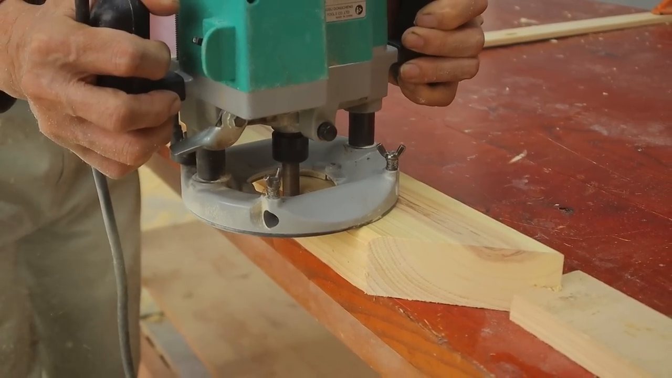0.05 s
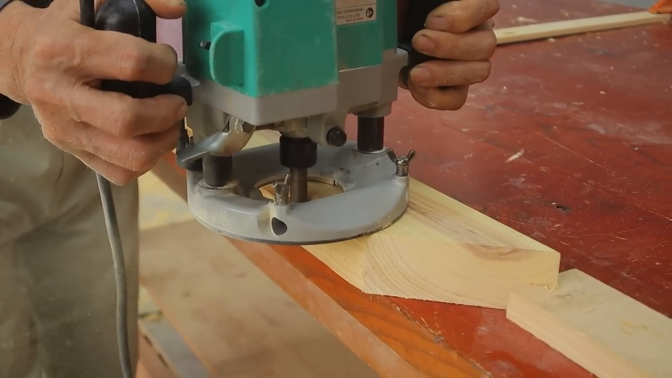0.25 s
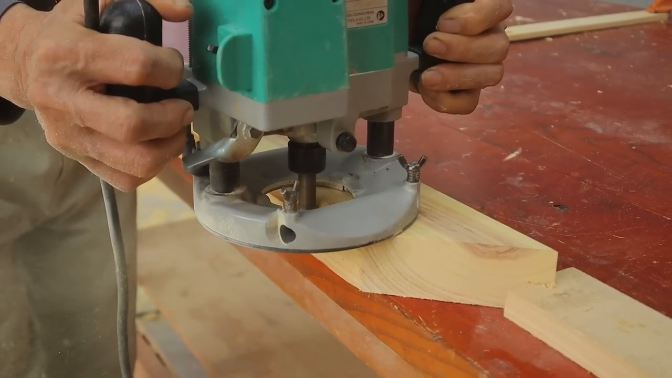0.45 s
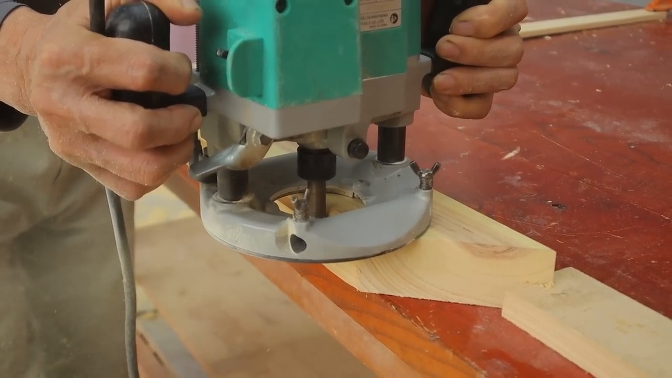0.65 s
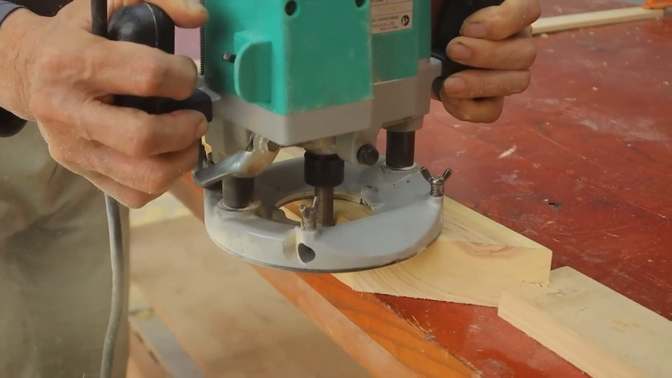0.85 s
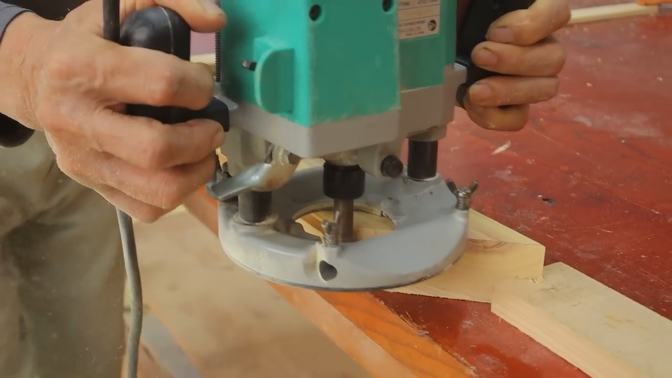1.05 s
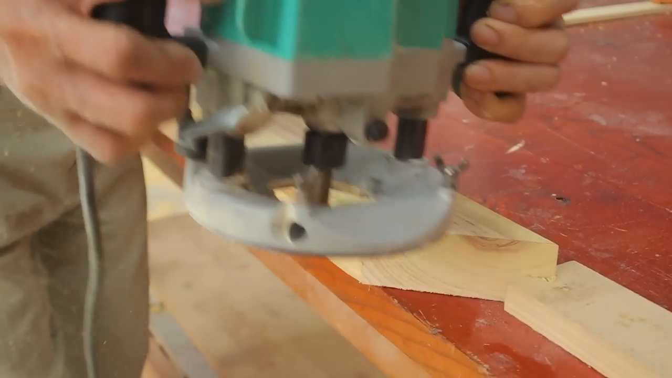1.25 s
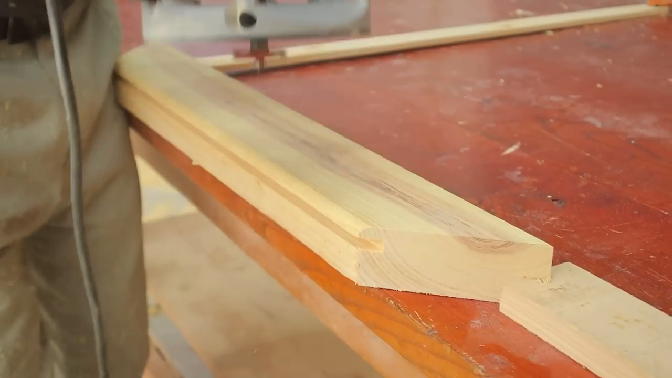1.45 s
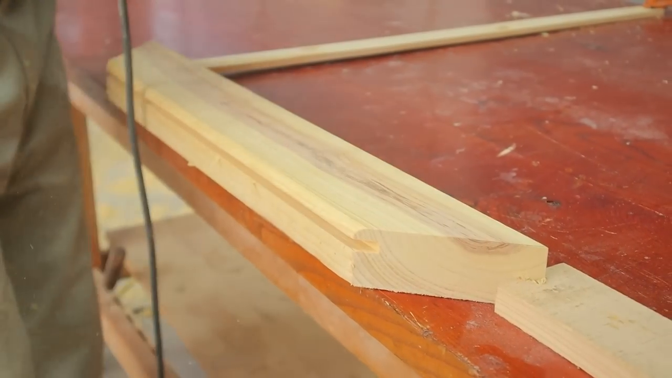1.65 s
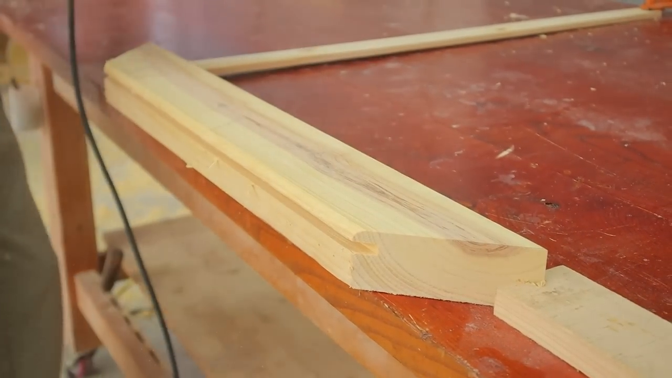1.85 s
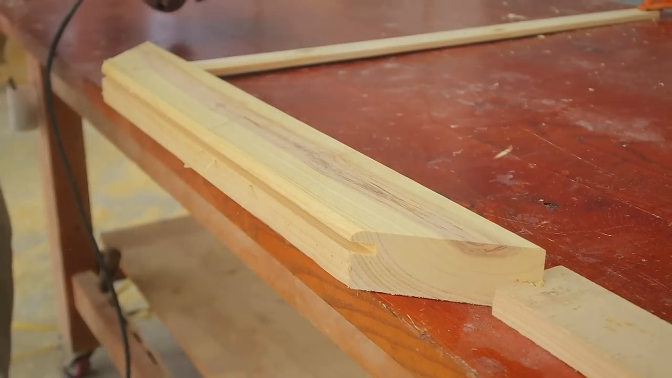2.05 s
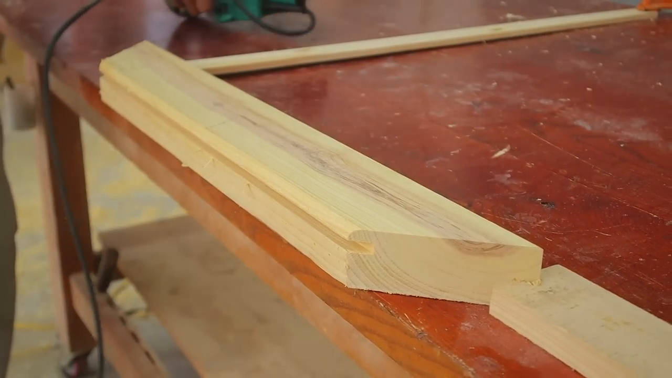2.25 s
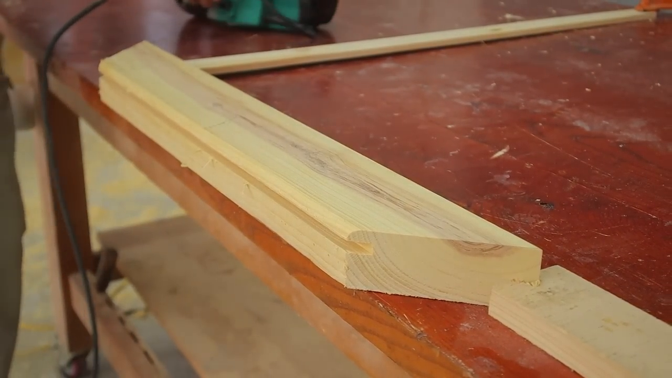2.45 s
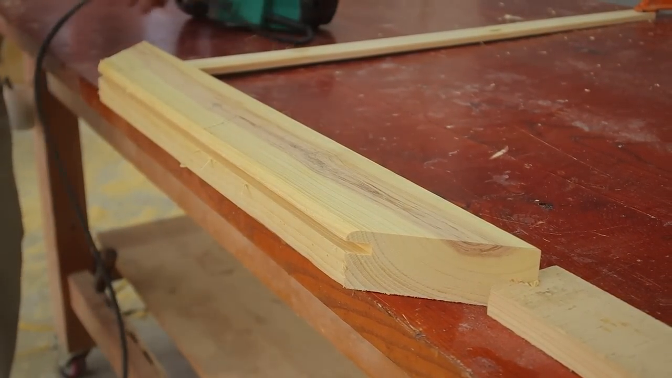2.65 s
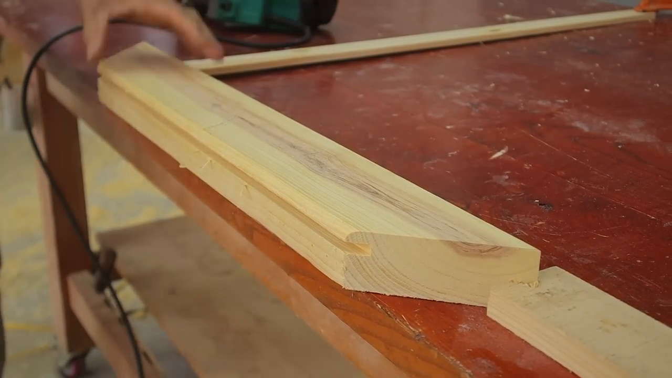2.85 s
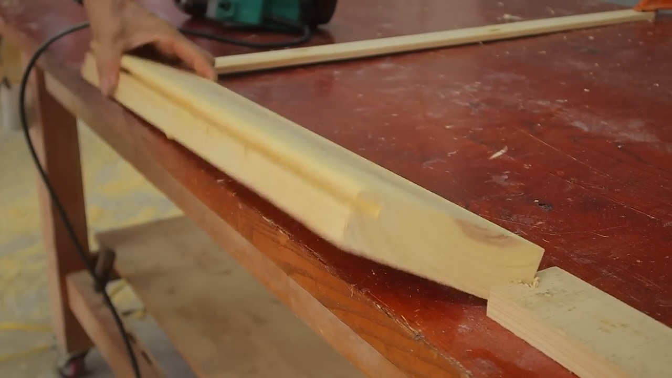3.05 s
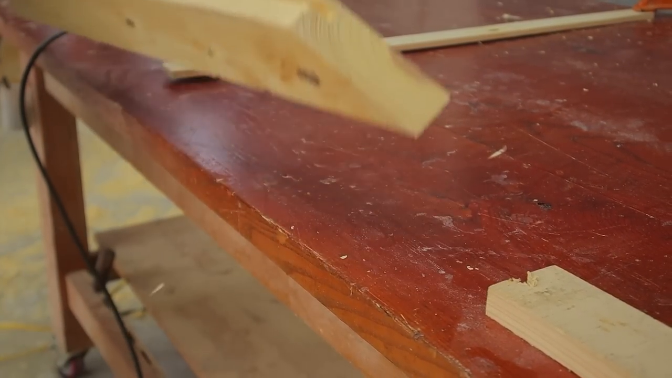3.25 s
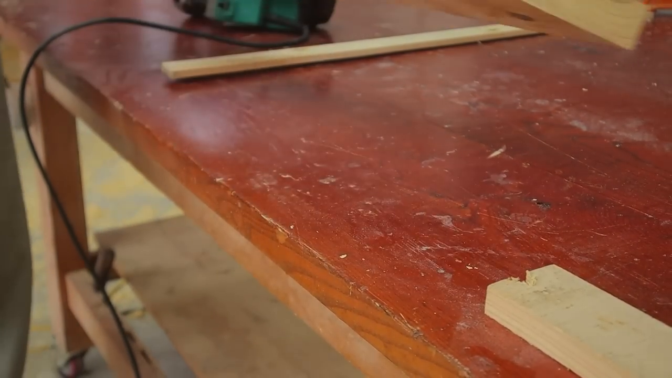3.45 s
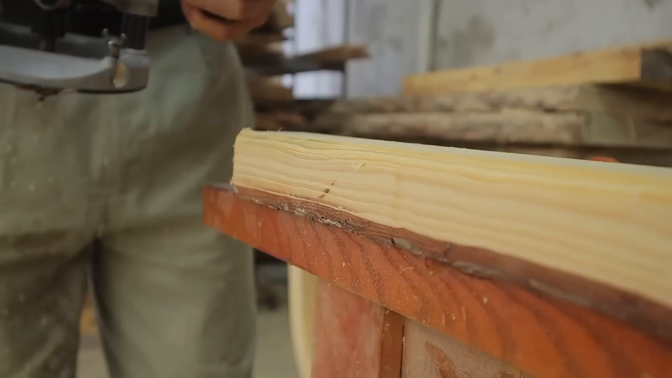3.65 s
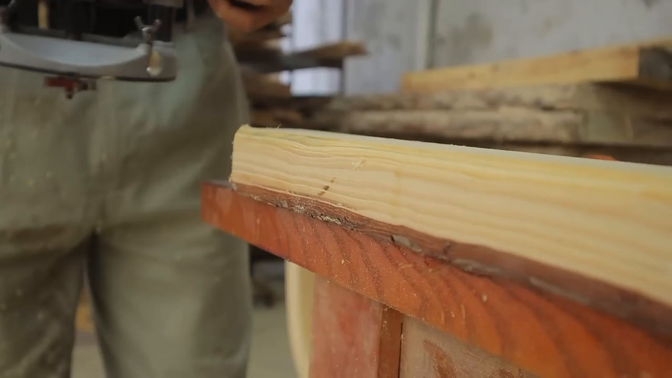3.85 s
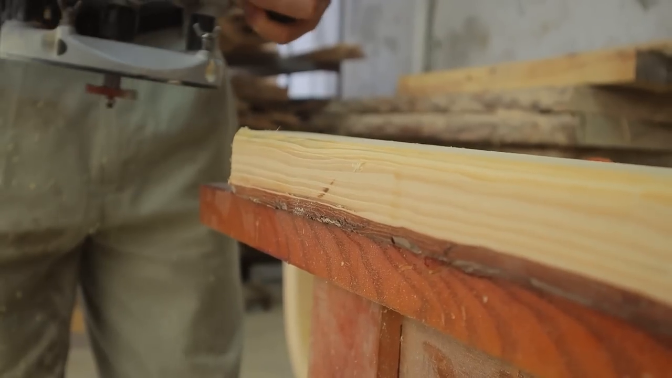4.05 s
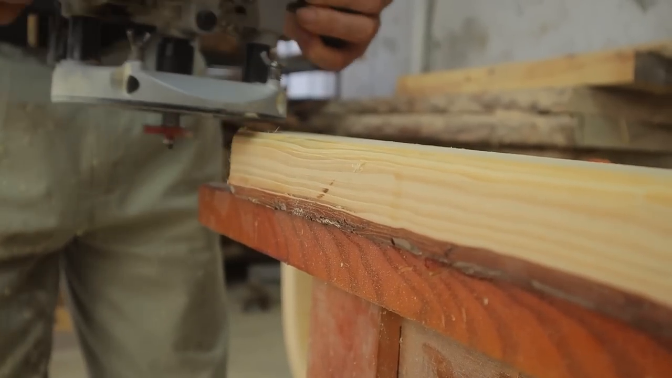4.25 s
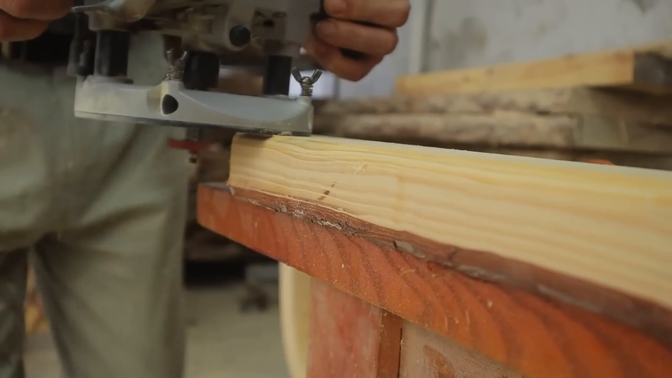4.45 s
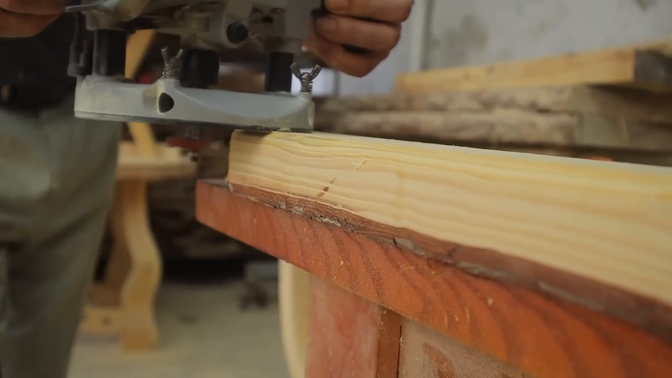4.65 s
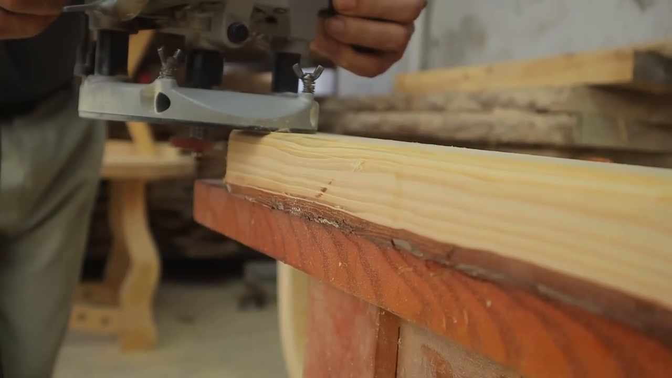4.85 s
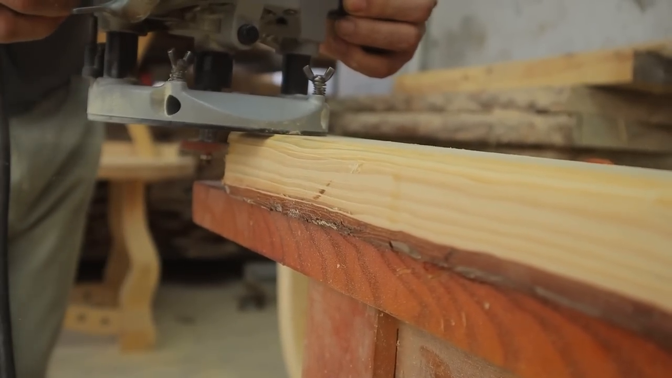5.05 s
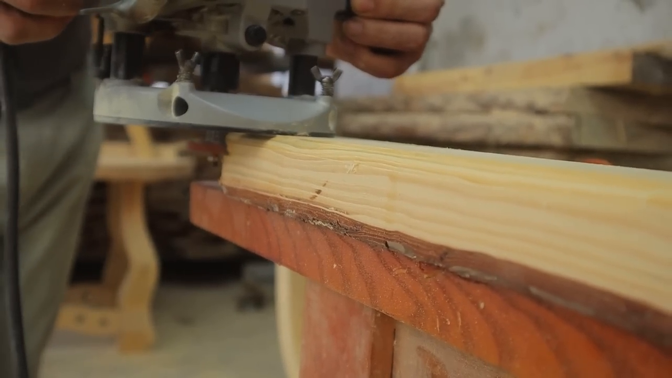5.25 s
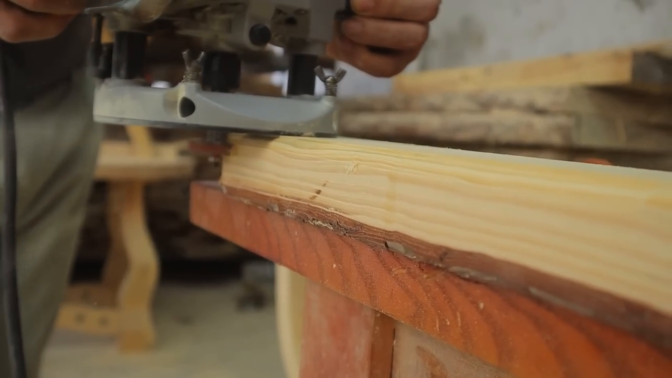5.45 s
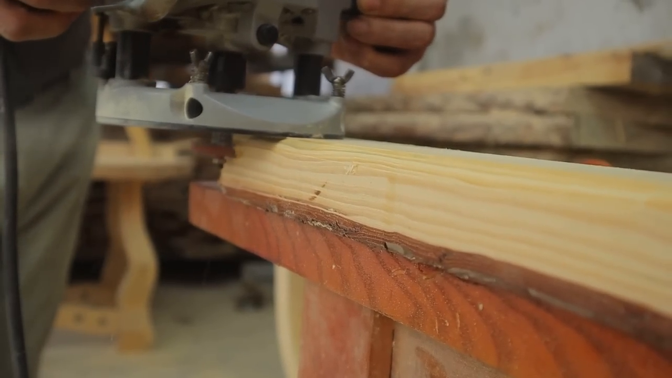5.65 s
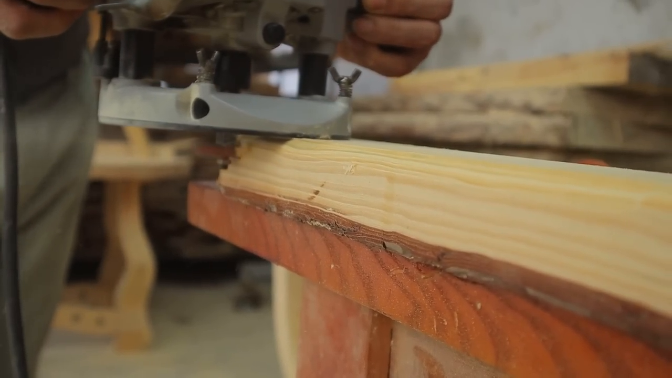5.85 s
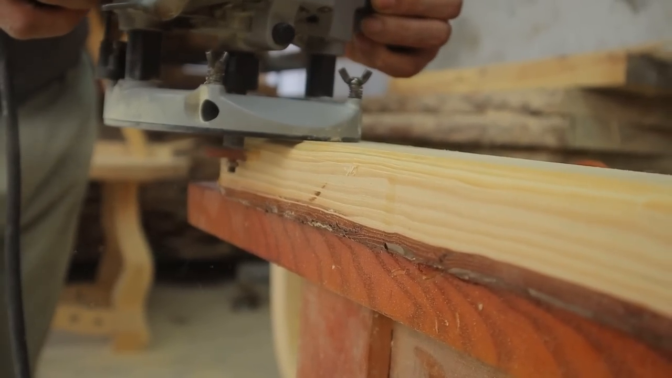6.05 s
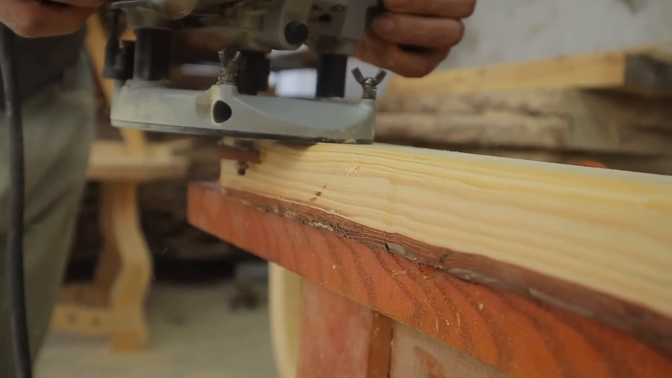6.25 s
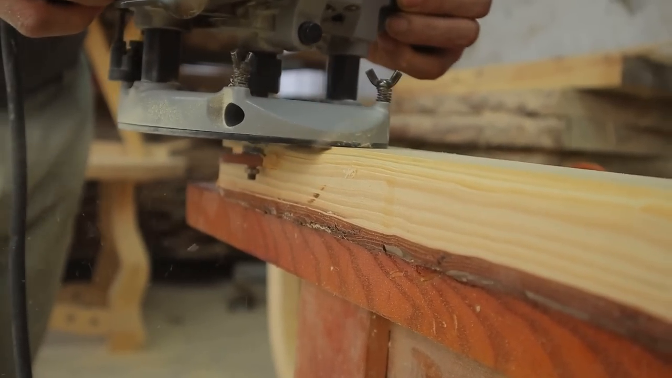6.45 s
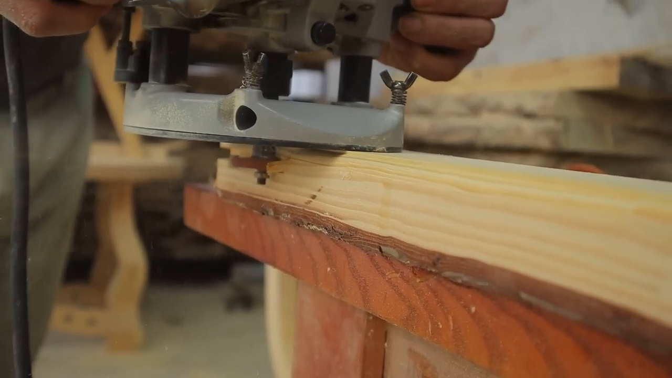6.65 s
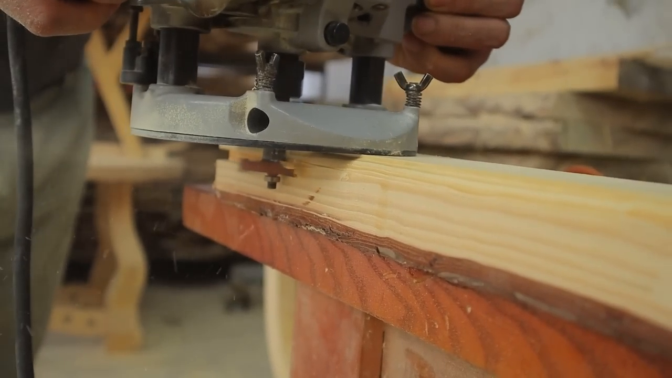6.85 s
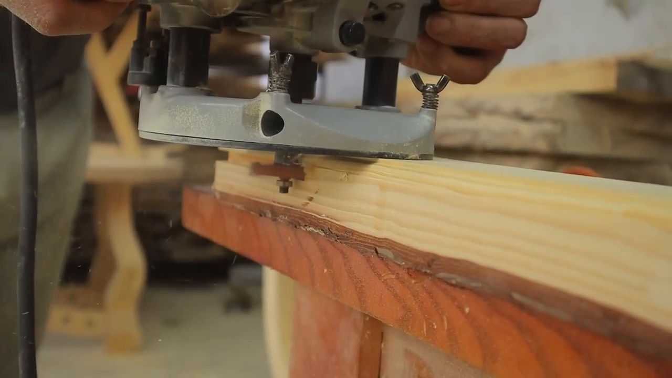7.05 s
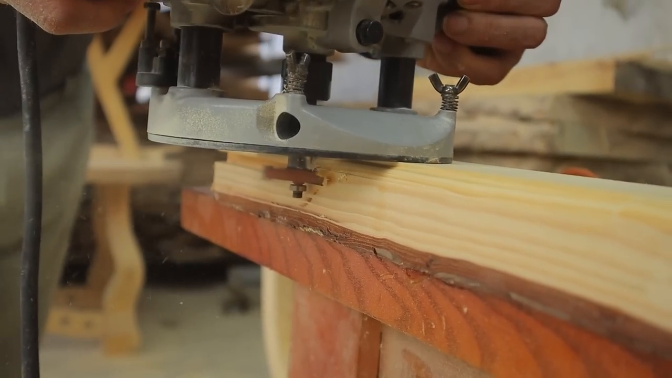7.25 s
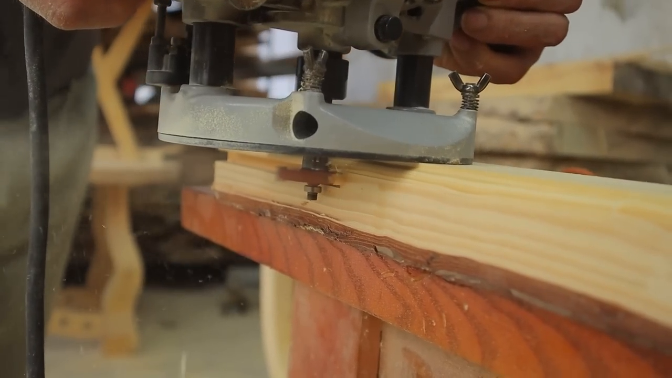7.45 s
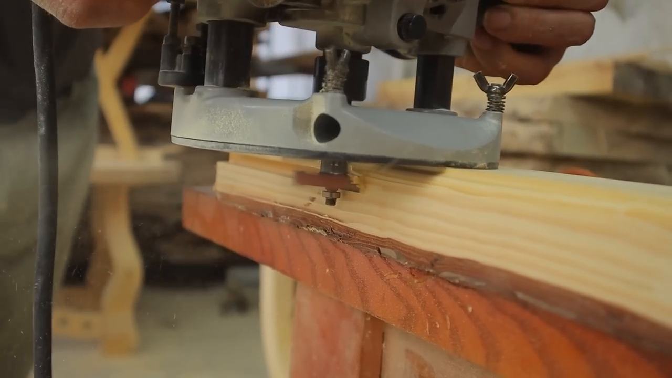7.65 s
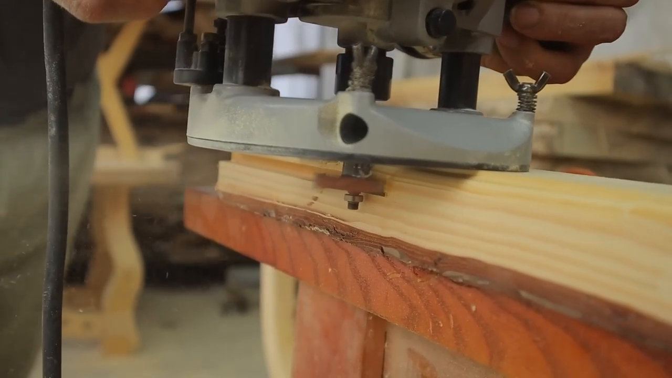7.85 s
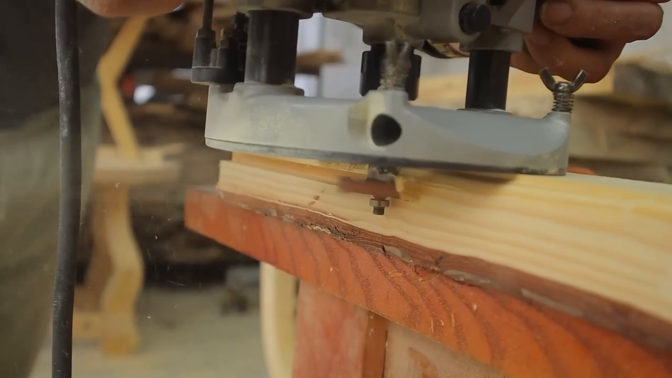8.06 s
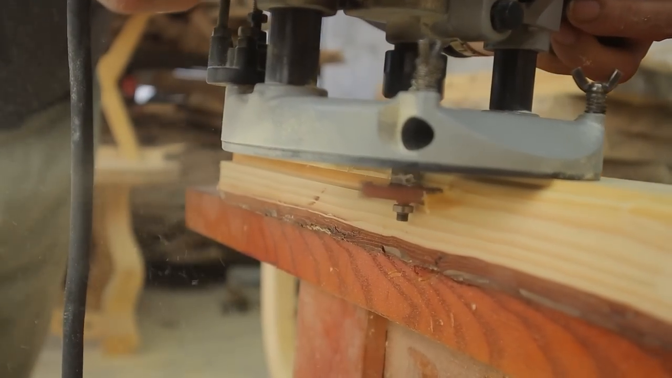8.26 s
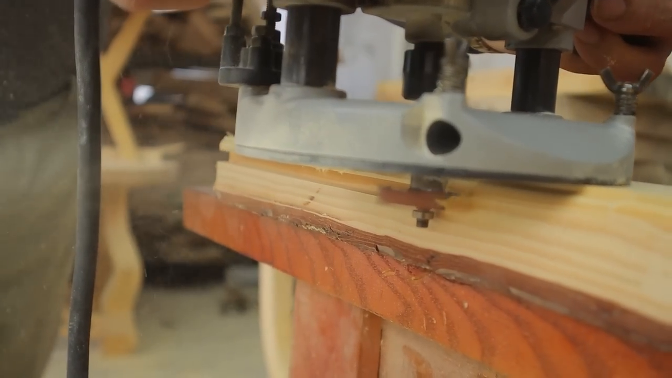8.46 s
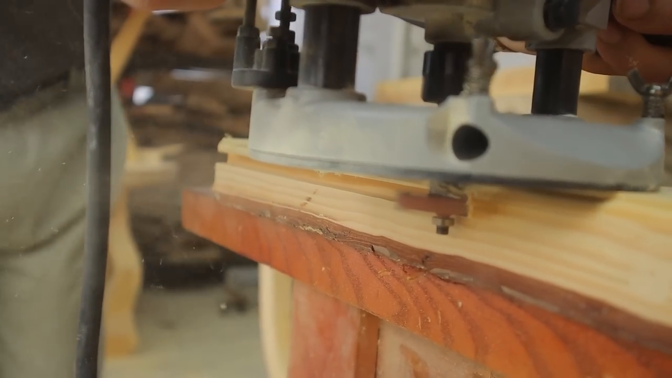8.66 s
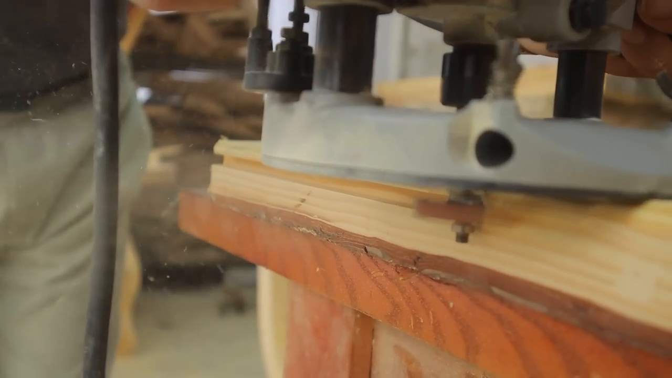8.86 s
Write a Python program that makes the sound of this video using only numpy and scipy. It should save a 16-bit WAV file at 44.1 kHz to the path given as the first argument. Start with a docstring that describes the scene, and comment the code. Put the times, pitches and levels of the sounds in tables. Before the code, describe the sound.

Close, dry stereo sound in a workshop. From 0 to about 1 s a hand router cuts a board edge: a rough, buzzing growl with dense harmonics, snapping wood fibres, thin high whine and throbbing fan rush, its pitch sagging slightly. Around 1.05-1.4 s it lifts clear and the pitch climbs; switched off at 1.4 s, it glides steadily downward, softer and airier, with dull bench knocks at 2.2-2.5 s. A firmer wooden thump at 3.58 s meets an abrupt cut at 3.6 s. Near-quiet follows, with a tiny creak, a click and faint bumps. At 4.05 s a router clicks on with a short rising squeak and races up to a bright, airy whine. From 5 s it bites, pitch falling markedly until about 6.6 s, then wavers in a loud, gritty rasp with low bench hum and soft air buffets from 7.5 s, slightly nearer by the end, still cutting at 9 s.

```python
"""Workshop, two scenes: a hand router mills the edge of a board, lifts off, is switched off and coasts
down while the board is picked up. After a hard cut a router starts up, races freely, then sags as it bites.
One shaft speed drives the cutter harmonics, the whine lines, the throbbing fan noise and the chip bursts.
Knocks, clicks, squeaks and air puffs are placed by table over low hum and shop noise."""
import sys
import numpy as np
from scipy import signal
from scipy.fft import rfft, irfft
from scipy.io import wavfile
from scipy.ndimage import uniform_filter1d

SR = 44100
rng = np.random.default_rng(int(sys.argv[2]) if len(sys.argv) > 2 else 0)


def int16_out(signal):
    """Quantize to a 16-bit WAV file."""
    q = np.round(np.clip(np.atleast_2d(signal).T, -1, 1) * 32767)
    wavfile.write(sys.argv[1], SR, q.astype(np.int16))


N = 392931
T = np.arange(N) / SR
HZ = np.fft.rfftfreq(N, 1 / SR)

# change of scene: (first scene ends [s], end of the near-silent gap [s], router starts up [s])
SCENE_CHANGE_S = (3.608, 3.63, 4.045)
CUT_S, GAP_END_S, START_UP_S = SCENE_CHANGE_S
SWITCH_OFF_S = 1.41
FREE_HZ = 774.3  # cutter strokes per second at free speed, two per shaft turn
# router put aside, then, in the second scene, creeping closer: (time [s], nearness [dB])
NEARNESS_DB = [(0, -0.8), (1, -0.64), (1.2, 0.14), (1.45, 0.26), (1.7, -1.6), (1.95, -3), (3.6, -2.5),
               (4.05, 0), (5.15, .4), (5.7, -0.5), (7.5, 0), (8.1, 0.9)]
# likeness of the two microphone ports, clipped to 0-1: (frequency [Hz], likeness)
PORT_LIKENESS = [(60, 7.5), (500, 3.3), (1300, 0.65), (2100, 1.34), (3400, 1.2), (5500, 0.59), (9000, 0.08),
                 (15000, 0.5)]
# lesser likeness for knocks and puffs: (frequency [Hz], likeness)
LOOSE_LIKENESS = [(60, .97), (130, 0.82), (290, .45), (700, 0.36)]
# colour of low turbulence and rumble: (frequency [Hz], relative density [dB])
RUMBLE_COLOUR = [(25, -29), (60, -4), (120, 0.5), (200, -1), (350, -1), (500, -6.5), (900, -24)]


def amp(db):
    """Amplitude ratio of a level in dB."""
    return 10 ** (np.asarray(db) / 20)


def unit(x):
    """Scale to rms 1."""
    return x / np.sqrt(np.mean(x ** 2) + 1e-20)


def curves(rows):
    """Each value column of a (time [s], values) table, at every sample."""
    s, *columns = np.transpose(rows)
    return [np.interp(T, s, column) for column in columns]


def read(points, hz=HZ):
    """Interpolate a (frequency [Hz], value) table over log frequency."""
    f, value = np.transpose(points)
    return np.interp(np.log(hz + 1), np.log(f + 1), value)


def add(mix, s, sound):
    """Add a sound to the mix in place, starting at s seconds."""
    part = mix[round(s * SR):][:len(sound)]
    part += sound[:len(part)]


def wander(rate_hz):
    """Random curve of rms about 1: straight lines between rate_hz random knots per second."""
    knots = rng.standard_normal(8192)
    return 1.22 * np.interp(T * rate_hz, np.arange(len(knots)), knots)


def ports(a, b, likeness=PORT_LIKENESS):
    """Mix two spectra into a partly alike left and right, with a phase lead between them."""
    # (frequency [Hz], lead of left over right [rad])
    lead_rad = [(60, 0.5), (220, -2.6), (480, -0.14), (4300, 0.53), (6000, 0.45), (9300, 0.2), (10800, -3)]
    same = np.clip(read(likeness), 0, 1)
    shared = np.sqrt((1 + same) / 2) * a
    apart = np.sqrt((1 - same) / 2) * b
    turn = np.exp(.5j * read(lead_rad))
    return irfft(np.array([(shared + apart) * turn, (shared - apart) / turn]), N)


def noise(colour_db, grain=1, likeness=PORT_LIKENESS):
    """Stereo noise of rms 1: white noise times a grain in time, then coloured."""
    a, b = rfft(rng.standard_normal((2, N)) * grain) * amp(colour_db)
    return unit(ports(a, b, likeness))


def bite():
    """Depth of the cutter in the wood, 0-1, at every sample."""
    # (time [s], depth)
    depth = [(1.03, 1), (1.1, .4), (1.18, .22), (1.25, 0), (4.97, 0), (5.03, .45), (5.7, 1)]
    return np.clip(curves(depth)[0], 0, 1)


def race(s, from_hz, spin_up_s=.32):
    """Stroke rate of the unloaded motor from time s, closing in exponentially on its free speed."""
    return FREE_HZ + (from_hz - FREE_HZ) * np.exp(-np.maximum(T - s, 0) / spin_up_s)


def speed(start_up_hz=382.6, coast_s=2.845):
    """Strokes per second: cutting, lifting off, slowing by friction; then starting up and cutting."""
    # (time [s], stroke rate [Hz])
    first_cut_hz = [(0.02, 564.7), (0.136, 544), (0.29, 530.2), (0.698, 514), (0.93, 513), (1.032, 517.2),
                    (1.1, 534)]
    # (time [s], stroke rate [Hz])
    second_cut_hz = [(5.02, 755), (5.14, 730), (5.32, 645.7), (5.47, 637.3), (5.7, 587), (5.8, 572.6),
                     (6.03, 558.5), (6.6, 515.2), (6.74, 514.8), (6.92, 526), (7.09, 529.2), (7.31, 521.3),
                     (7.53, 528), (7.8, 525.1), (8.19, 510.5), (8.4, 525.2), (8.57, 510), (8.76, 528),
                     (8.9, 529.3)]
    lift_s, lift_hz = first_cut_hz[-1]
    second_cut_s = second_cut_hz[0][0]
    lifted = race(lift_s, lift_hz)
    coasting = np.interp(SWITCH_OFF_S, T, lifted) * np.exp((SWITCH_OFF_S - T) / coast_s)
    return np.select([T < lift_s, T < SWITCH_OFF_S, T < START_UP_S, T < second_cut_s],
                     [curves(first_cut_hz)[0], lifted, coasting, race(START_UP_S, start_up_hz)],
                     curves(second_cut_hz)[0])


def shaft(rate_hz, jitter=0.001063, jitter_hz=110):
    """Phase of the cutter strokes: the integrated rate, with a small random speed jitter."""
    return 2 * np.pi * np.cumsum(rate_hz * (1 + jitter * wander(jitter_hz))) / SR


def flow(rise_s=0.05):
    """Share of the air flow built up: exponential rise after the start-up, 1 before it."""
    since_s = T - START_UP_S
    return np.where(since_s > 0, 1 - np.exp(-abs(since_s) / rise_s), 1)


def strengths(rate_hz, tones_db=0, rasp_db=-1.57, build_up=3):
    """Gains of the four low tones and the rasp: set by the cut in the wood, by the speed in free air."""
    # (time [s], low tones [dB], rasp [dB]), before the offsets below
    first_force = [(0.0, -31, -28.5), (0.092, -26, -29.5), (0.428, -25.5, -32.5), (0.658, -23.5, -29),
                   (0.712, -24.5, -33), (1.05, -26.5, -25)]
    # (time [s], low tones [dB], rasp [dB])
    second_force = [(5.03, -27.5, -25), (5.06, -24.5, -32), (5.15, -30, -30), (5.3, -27.5, -31),
                    (5.36, -33.5, -36), (5.67, -24, -29.5), (6.07, -22, -30.5), (6.14, -25, -29.5),
                    (6.23, -21.5, -28.5), (7.43, -27.5, -26.5), (7.51, -22, -25), (8.03, -25.5, -22),
                    (8.8, -23, -25.5), (8.9, -24.5, -22)]
    # response of the board under the cutter: (frequency [Hz], level [dB])
    board_db = [(510, -17.5), (528, -19), (542, -4), (556, 0.5), (572, -10), (640, -8.5), (760, -16),
                (1030, -12), (1120, -11), (1300, -3), (1480, -2), (1570, -4), (1720, -4.5), (2060, -4),
                (2200, -3.5), (2350, 1), (2600, -2), (3000, -10)]
    # response of the router in free air: (frequency [Hz], level [dB])
    body_db = [(345, -47), (520, -57.5), (640, -49.5), (740, -49.5), (840, -46), (920, -63), (1070, -48),
               (1170, -62), (1390, -44.5), (1580, -53), (1760, -35), (1900, -30.5), (2040, -40.5),
               (2180, -55), (2800, -43)]
    # (stroke multiple, first cut [dB], second cut [dB], free air [dB], free-air slope [dB/octave of speed])
    low_tones = [(1, 1, -2, -1.5, 2.5), (2, 0.5, -0.5, 0, 15.5), (3, -3.5, 0, 0, 37), (4, 2, -1.2, -11, 45)]
    full_contact = 0.47  # depth that gives full cutting strength
    lifted_db = 3.5  # louder when clear of the wood after the first cut
    singing_hz = 668  # stroke rate at which the free rasp is loudest
    free_rasp_db, off_speed_db = -35.5, 130  # level there, loss an octave away

    tones, rasp = curves(list(first_force) + list(second_force))
    contact = np.minimum(bite() / full_contact, 1)
    early = T < CUT_S
    # the tones come in later than the rush
    free = (1 - contact ** 2) * flow() ** build_up * amp(lifted_db * early)
    octaves = np.log2(rate_hz / singing_hz)
    low = []
    for k, (_, first, second, free_db, doubling_db) in enumerate(low_tones, 1):
        cutting = amp(tones + tones_db + read(board_db, k * rate_hz) + np.where(early, first, second))
        running = amp(free_db + doubling_db * octaves + read(body_db, k * rate_hz))
        low.append(contact * cutting + free * running)
    singing = amp(free_rasp_db - off_speed_db * octaves ** 2 + curves(NEARNESS_DB)[0])
    return low, contact * amp(rasp + rasp_db) + free * singing


def cutter(phase, low, rasp, dull_db=8.0, flutter_db=1.47, chatter_db=2, drift_db=1.5,
           free_drift_db=2.35, rough=0.034, spread=0.41):
    """Each edge stroke repeats one push on the wood: a stack of harmonics with ripple side tones."""
    # (stroke multiple, first pass [dB], second pass [dB])
    rasp_lines = [(5, -6.5, -5), (5.77, -1.5, -4.5), (6.77, -13, -6), (8, -8.5, -12.5), (8.8, -7.5, -15.5),
                  (9.7, -13.5, -19), (12.106, -15.5, -18.5), (12.9, -35, -36), (15.1, -33, -28),
                  (17.8, -30, -27), (23, -30, -26.5), (27, -35, -36)]
    # side tones from mains ripple in the torque: (offset [Hz], level [dB])
    ripple = [(200.5, -19), (401, -19), (-200.5, -24), (601.5, -27)]
    depth = bite()
    free = 1 - depth
    grazing = 4 * depth * free  # a cutter that only just touches the wood chatters
    shake_db = flutter_db + chatter_db * grazing
    sway_db = drift_db + free_drift_db * free  # tones swell and fade more in free air

    tones = []
    for k, gain in enumerate(low, 1):
        level = gain * amp(shake_db * wander(35) + sway_db * wander(11))
        tones.append(level * np.exp(1j * (k * phase + 2 * np.pi * rng.random())))
    lowest, *others = tones
    stack, side = sum(others), np.zeros(N)

    multiple, first, second = np.transpose(rasp_lines)
    for k in range(5, 28):
        db = np.where(T < CUT_S, np.interp(k, multiple, first), np.interp(k, multiple, second))
        db = db + 1.5 * wander(22) + .8 * wander(4)  # the grain changes along the board
        db -= dull_db * free * min(k - 5, 6)  # out of the wood the strokes lose their edge
        line = rasp * amp(db) * np.exp(1j * (k * phase + 2 * np.pi * rng.random()))
        stack += line
        side += line.imag * wander(4.0)

    stack *= 1 + sum(amp(db) * np.exp(2j * np.pi * (hz * T + rng.random())) for hz, db in ripple)
    sound = (lowest + stack).real * (1 + rough * wander(400))
    return ports(rfft(sound), rfft(side + spread * stack.imag))


def whine(phase, rush, flutter_db=3, blur_rad=0.91, free_db=-11, unload_s=1.34):
    """Thin shaft, fan and commutator lines; the high ones sink into the rush when racing freely."""
    # levels against the rush: (stroke multiple, under load [dB], coasting [dB])
    whine_lines = [(0.498, -30.5, -41), (12, -15.5, -32), (14, -38, -24), (15, -24, -36), (16, -15, -19),
                   (18, -34, -15), (20, -17.5, -25), (22, -38, -32), (24, -21, -32), (27.9, -19, -29),
                   (32.03, -34, -25)]
    # muffling of the highest lines by the housing: (frequency [Hz], level [dB])
    muffling = [(10500, -2), (13000, -5), (15500, -9)]
    coasting = np.clip((T - SWITCH_OFF_S) / unload_s, 0, 1) * (T < START_UP_S)
    racing = (1 - bite()) * (1 - coasting)
    rate_hz = np.gradient(phase) * SR / (2 * np.pi)
    out = np.zeros((2, N))
    for k, loaded, idle in whine_lines:
        db = loaded + (idle - loaded) * coasting
        db = db + free_db * racing * (k > 1) + read(muffling, k * rate_hz)
        level = rush * amp(db + flutter_db * wander(25)) * (k * rate_hz < SR / 2)
        shake = blur_rad * wander(220)
        out += level * np.array([np.sin(k * phase + shake + 0.26 * wander(7)) for _ in range(2)])
    return np.sqrt(2) * out


def fan_gain(law, rate_hz):
    """Gain of a fan-driven sound: it grows with speed, with cutting and with nearness."""
    free_db, doubling_db, cutting_db, near = law
    db = free_db + doubling_db * np.log2(rate_hz / FREE_HZ)
    db = db + cutting_db * bite() + near * curves(NEARNESS_DB)[0]
    return flow() * amp(db)


def air(phase, rush, hiss, pulsing=0.22, flicker_db=0.82):
    """The fan drives air through the resonant housing; the rush throbs with the cutter strokes."""
    # (frequency [Hz], relative density [dB])
    rush_colour = [(60, -50), (150, -23.5), (300, -22), (500, -8), (750, -12.5), (1000, -4.5), (1350, 0.5),
                   (1800, -5.5), (2400, -2.5), (3700, 0.5), (5000, -0.5), (5700, -4), (8000, -15),
                   (15000, -49)]
    # (frequency [Hz], relative density [dB])
    hiss_colour = [(2500, -45), (4500, 3.5), (5600, -5), (7200, -1), (8800, -4), (10500, -7.5),
                   (13000, -12), (15500, -20)]
    # housing air resonances: (frequency [Hz], width [Hz], lift [dB])
    resonances = [(1260, 470, 0.5), (2346, 420, 5.5), (3160, 280, 2.5), (3840, 710, 3.5), (4460, 210, -6),
                  (4830, 320, 1.5), (5440, 400, -2.5)]
    housing_db = sum(db / (1 + (2 * (HZ - hz) / width) ** 2) for hz, width, db in resonances)
    throb = 1 + pulsing * np.cos(phase)
    sound = rush * noise(read(rush_colour) + housing_db, throb)
    sound = sound + hiss * noise(read(hiss_colour) + housing_db)
    return sound * amp(flicker_db * wander(70))


def chips(phase, rasp, chips_db=-12, scatter_db=4, snaps_per_s=1500):
    """Fibres snap as an edge passes: random impulses, a few much larger than the rest."""
    snaps = rng.random(N) < snaps_per_s / SR * (1 + np.cos(phase))
    size = amp(np.minimum(scatter_db * rng.exponential(1, N), 13))
    colour_db = read([(200, -54), (1200, 3.5), (3000, -3.0), (7000, -7.5), (15000, -10)])
    return rasp * amp(chips_db) * noise(colour_db, snaps * size)


def blows(rows, breadth):
    """Quickly dying noise bursts, each centred on its own frequency, `breadth` setting the octave width."""
    out, t = np.zeros(N), np.arange(8192) / SR
    f = np.fft.rfftfreq(len(t), 1 / SR) + 1
    for s, db, hz, t60 in rows:
        colour = 1 / (1 + (np.log2(f / hz) / breadth) ** 4) ** 2
        burst = irfft(rfft(rng.standard_normal(len(t))) * colour)
        ring = burst * amp(-60 * t / t60) * (1 - np.exp(-t * hz * 2))
        add(out, s, amp(db) * ring / abs(ring).max())
    return out


def knocks(knock_db=-2, low_hz=75):
    """Tool and board bump on the wooden bench, which radiates little below low_hz."""
    # (time [s], peak before knock_db and low cut [dB], main frequency [Hz], t60 [s])
    bumps = [(2.211, -29.5, 264, 0.21), (2.398, -35, 224.1, 0.16), (2.435, -35, 240.7, 0.29),
             (2.535, -35.5, 263, .13), (3.544, -29, 218, 0.041), (3.571, -25, 200.4, 0.08),
             (3.581, -16, 320, 0.054), (3.582, -22.5, 96, 0.055), (3.733, -42.5, 200, 0.037),
             (3.89, -45, 208, 0.19), (3.936, -43, 194, 0.07), (3.972, -47, 200, 0.069),
             (4.16, -42, 240, 0.13)]
    low_cut = amp(knock_db) * HZ ** 2 / np.hypot(HZ ** 2, low_hz ** 2)
    a, b = [low_cut * rfft(blows(bumps, breadth)) for breadth in (1.63, 2)]
    return ports(a, b, LOOSE_LIKENESS)


def clicks():
    """Sharp clicks, the switch among them: very short noise bursts."""
    # (time [s], peak [dB], frequency [Hz], t60 [s])
    snaps = [(3.6675, -29, 2570, 0.0026), (4.044, -35, 4250, 0.018)]
    return blows(snaps, breadth=0.63)


def squeaks():
    """A creak of a few ringing slips, and a short rising squeak as the motor starts."""
    # (start [s], slip rate [Hz], length [s], slip peak [dB])
    creak = (3.631, 192, .021, -32)
    # ringing of each slip: (frequency [Hz], relative level [dB], t60 [s])
    creak_modes = [(251, 8, 0.0099), (900, 6, 0.0097), (1280, -6, 0.022), (2195, -19, .01)]
    # (start [s], length [s], from [Hz], to [Hz], peak [dB])
    chirp = (4.07, .026, 3700, 4750, -30)
    out, t = np.zeros(N), np.arange(1024) / SR
    start, rate_hz, length, db = creak
    slip = sum(amp(level - 60 * t / t60) * np.cos(2 * np.pi * hz * t) for hz, level, t60 in creak_modes)
    slip = signal.lfilter(*signal.butter(4, 2600, fs=SR), slip)
    for s in np.arange(start, start + length, 1 / rate_hz):
        add(out, s, -amp(db) * slip / abs(slip).max())

    start, length, from_hz, to_hz, db = chirp
    glide_hz = np.linspace(from_hz, to_hz, round(length * SR))
    squeak = np.hanning(len(glide_hz)) * np.sin(2 * np.pi * np.cumsum(glide_hz) / SR)
    add(out, start, amp(db) * squeak)
    return out


def puffs(puff_db=-4):
    """Cooling air buffets the microphone: Gaussian swells of low turbulence."""
    # (time [s], peak before puff_db [dB], length [s])
    swells = [(7.522, -41.5, .04), (7.585, -34, 0.087), (7.689, -32, 0.077), (7.747, -48, .05),
              (7.815, -32.5, 0.076), (7.865, -39, 0.08), (7.95, -39.5, 0.11), (8.102, -41.5, 0.083),
              (8.32, -41.5, 0.049), (8.408, -39, 0.096)]
    swell = sum(amp(db) * np.exp(-(2 * (T - s) / length) ** 2) for s, db, length in swells)
    return amp(puff_db) * swell * noise(read(RUMBLE_COLOUR), likeness=LOOSE_LIKENESS)


def hum(rumble_db=-5, lead_rad=0.12):
    """The motor shakes the bench: low lines, out of step at the two ports, over a dull rumble."""
    # (frequency [Hz], level against the swell [dB])
    hum_lines = [(150.7, -10.5), (200.3, 3), (279.9, -2), (400.8, -7)]
    # (time [s], level [dB])
    swell_db = [(0, -83), (.8, -62), (1.2, -76.5), (3.6, -73), (3.7, -77), (5, -93), (5.8, -69),
                (6.1, -60.5), (7.4, -59)]
    level, = curves(swell_db)
    ahead = lead_rad * np.array([[.5], [-.5]])
    lines = sum(amp(db + 2.1 * wander(14)) * np.sin(2 * np.pi * hz * T + ahead) for hz, db in hum_lines)
    return amp(level) * (np.sqrt(2) * lines + amp(rumble_db) * noise(read(RUMBLE_COLOUR)))


def shop_noise():
    """Background noise of the shop: coloured noise on a slow level curve."""
    # (frequency [Hz], relative density [dB])
    floor_colour = [(25, -22), (90, -7.5), (200, -4), (500, -11), (2300, -12), (15000, -39)]
    # (time [s], level [dB])
    floor_db = [(4.1, -63), (4.6, -74), (6, -70)]
    return amp(curves(floor_db)[0]) * noise(read(floor_colour))


def scene():
    """Two scenes: no router between the cut and the start-up; a short near-silent gap marks the cut."""
    # (at free speed [dB], per doubling of speed [dB], added by cutting [dB], per dB of nearness [dB])
    rush_law = (-30, 10, 3.5, 1.5)
    # (at free speed [dB], per doubling of speed [dB], added by cutting [dB], per dB of nearness [dB])
    hiss_law = (-31.5, 18, 2.8, 3)
    rate_hz = speed()
    phase = shaft(rate_hz)
    low, rasp = strengths(rate_hz)
    rush, hiss = fan_gain(rush_law, rate_hz), fan_gain(hiss_law, rate_hz)
    router = np.sqrt(2) * cutter(phase, low, rasp) + whine(phase, rush)
    router = router + air(phase, rush, hiss) + chips(phase, rasp)
    router *= (T < CUT_S) | (T > START_UP_S)
    handling = knocks() + clicks() + squeaks()
    shop = puffs() + hum() + shop_noise()
    gap = np.where((T > CUT_S) & (T < GAP_END_S), amp(-12), 1)
    return (router + handling + shop) * uniform_filter1d(gap, 40)


def record(dry, edge_hz=15750):
    """Balance the two ports over time and frequency, then low-pass at edge_hz."""
    # (time [s], left minus right [dB])
    pan_db = [(0, -0.69), (3.6, -0.35), (5.2, -0.76), (5.9, -1.76), (6.7, -0.33), (7.3, 0.84), (8.1, -2.17)]
    # (frequency [Hz], left minus right [dB])
    tilt_db = [(300, 1), (1000, 1), (4000, -1.1), (8000, -0.17)]
    sides = np.array([[.5], [-.5]])
    sound = dry * amp(sides * curves(pan_db)[0])
    sound = irfft(rfft(sound) * amp(sides * read(tilt_db)), N)
    low_pass = signal.firwin(511, edge_hz, window=("kaiser", 9), fs=SR)
    return signal.oaconvolve(sound, low_pass[None], "same")


dry = scene()
out = record(dry)
int16_out(out)
```